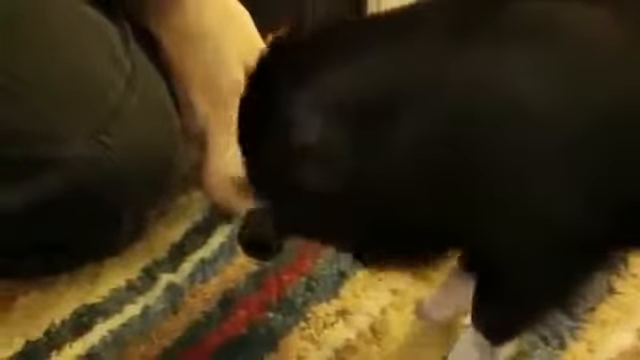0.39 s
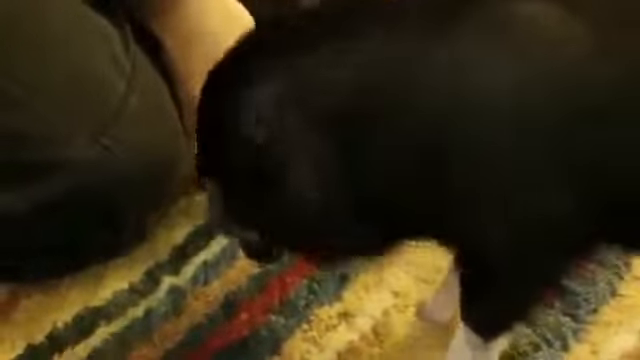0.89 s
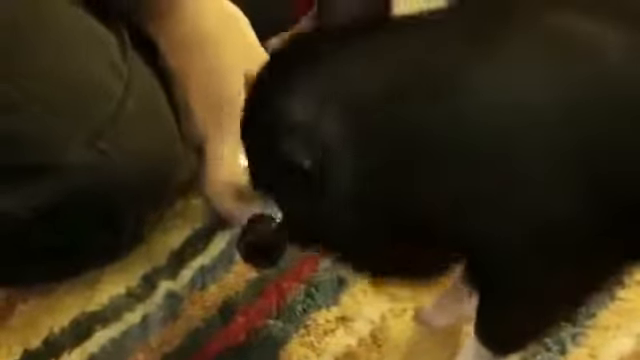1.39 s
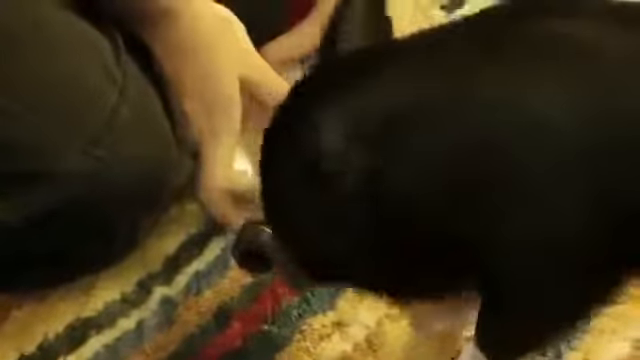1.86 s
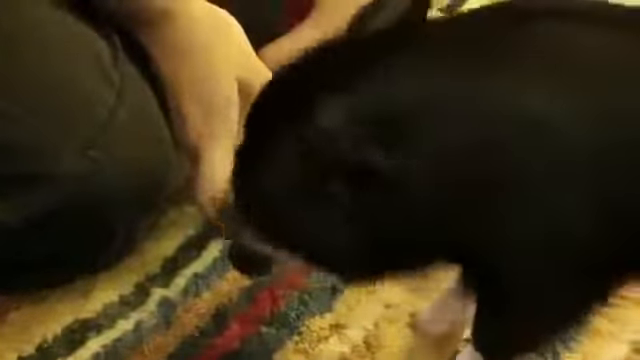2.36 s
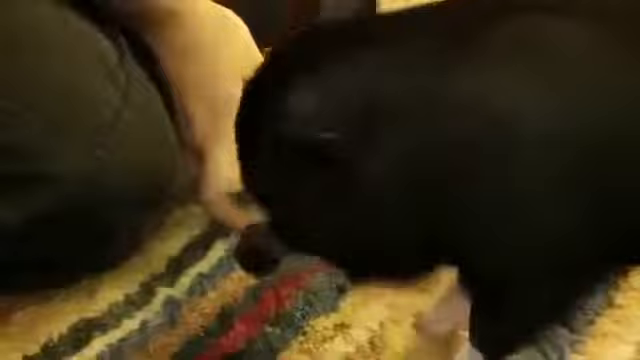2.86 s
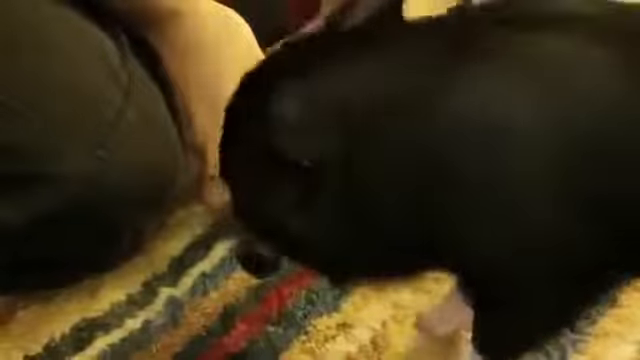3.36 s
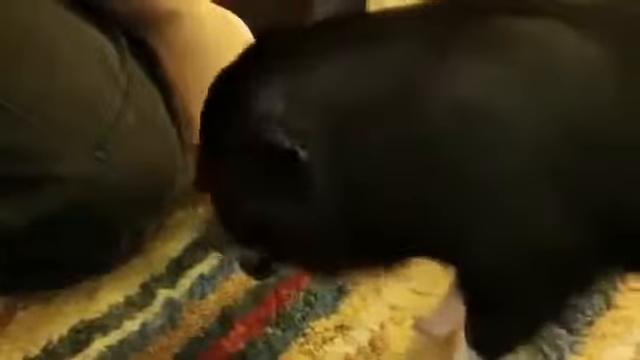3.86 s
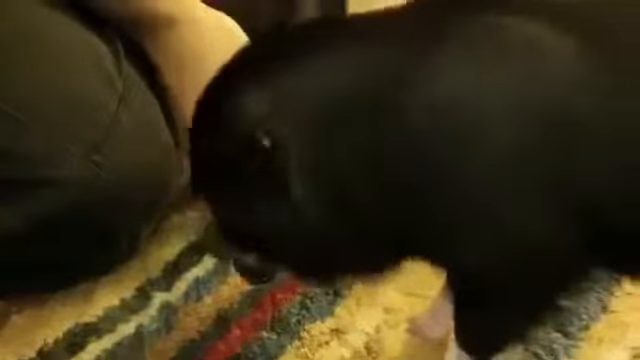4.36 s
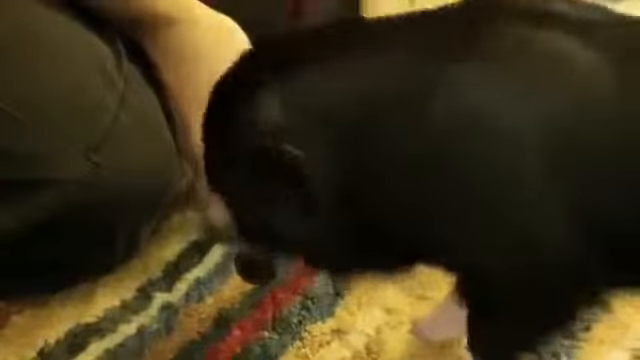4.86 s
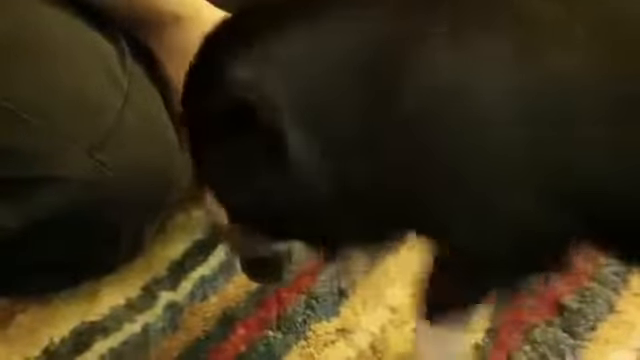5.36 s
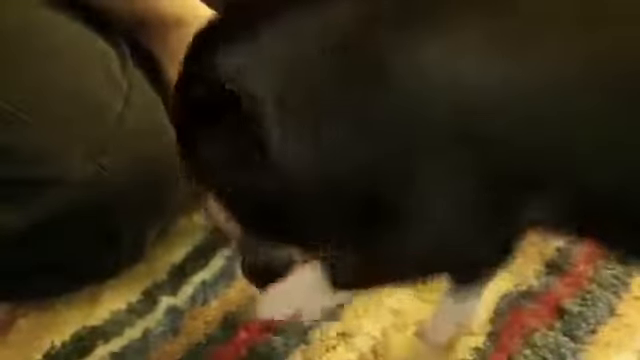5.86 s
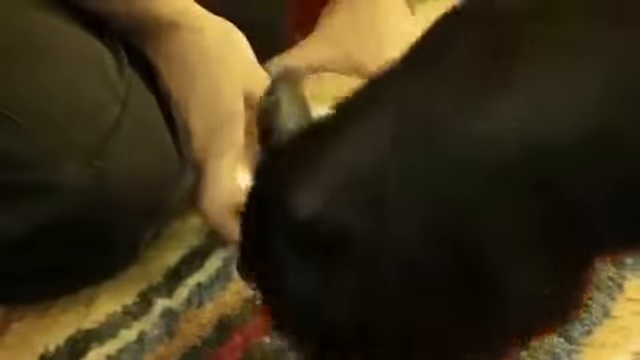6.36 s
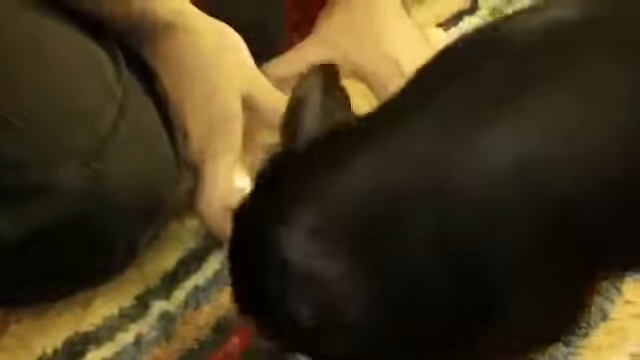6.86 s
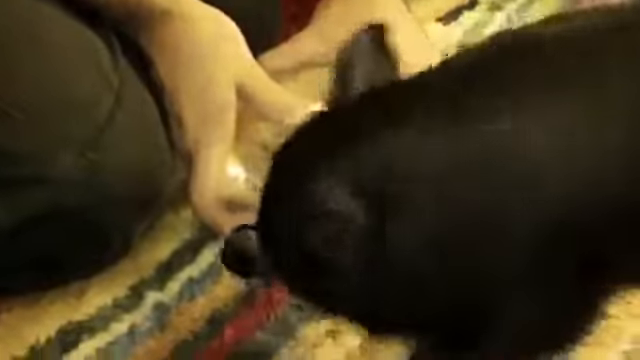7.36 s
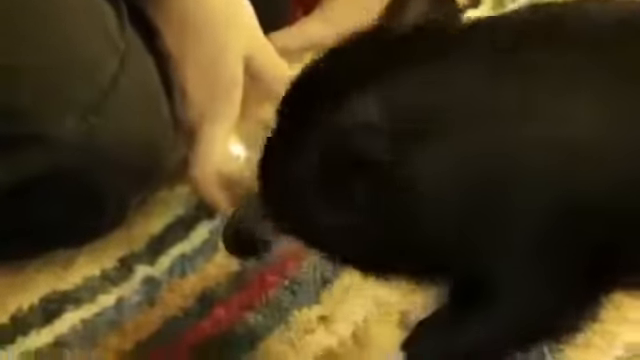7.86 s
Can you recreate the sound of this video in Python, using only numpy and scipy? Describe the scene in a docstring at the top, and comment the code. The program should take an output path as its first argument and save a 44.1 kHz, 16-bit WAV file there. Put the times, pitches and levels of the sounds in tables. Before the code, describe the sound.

A pig chews an empty plastic bottle on a rug, very close to a stereo microphone in a small furnished room. From 0 to 0.8 seconds, loud hollow pops and crunchy crackle come in tight clusters, the hardest near 0.13 and 0.7, with low microphone thuds. From 0.9 to 2 the bites are sparser, with soft deep knocks around 1 second. From 2.2 to 3.3 chewing is busy, rattling with clicks and ticks. A hard pop thuds at 3.4; uneven crunches follow, with strong pops near 4.15 and 4.8. A bright, sharp snap cracks at 5.7, then short crackles run to 6.45. It nearly falls quiet until a lone pop at 7.0, then small clicks return from 7.3 and thicken to the end at about 8.2. Reflections are short and dry, and a faint, wide, low-weighted hush stays throughout.

```python
"""A pig chews and nudges an empty plastic bottle held on a rug, close to two microphones indoors.
The wall buckles in pops, small ticks and dense crackle, bite by bite: short blows ring the bottle's modes.
Low knocks are dying sines; a broad low mode gives the thumps of the overloaded microphone at a few loud pops.
A small furnished room answers with near copies and a noisy tail, over a quiet, wide floor of filtered noise."""
import sys
import numpy as np
from scipy import signal
from scipy.fft import rfft, irfft, next_fast_len
from scipy.io import wavfile

SR = 44100
rng = np.random.default_rng(int(sys.argv[2]) if len(sys.argv) > 2 else 0)


def invert_db(x):
    """Field ratio 10**(x/20) for x, a level in decibels (scalar or array-like)."""
    u = np.asarray(x, float) / 20
    return 10 ** u


def to_wav(s):
    """Save 16-bit WAV."""
    ch = np.atleast_2d(s).T  # columns
    pcm = np.round(np.clip(ch, -1, 1) * 32767)  # PCM
    wavfile.write(sys.argv[1], SR, pcm.astype(np.int16))


N = 362943  # length in samples

# Levels in the tables are relative: trims, the room and the microphones act on them later.
# loudest pops of the wall: start_s, level_db, then against it upper_db, thump_db, skin_db
POPS = [(0.018, -27, -11, -11, -13), (0.094, -9.5, -11, -13, -20.5), (0.115, -15, -12, -6.5, -24),
        (0.117, -5, -21.5, -27, -40), (0.129, -7, -6, -19, -4), (0.136, -5.5, -16.5, -27, -3),
        (0.144, -13.5, -5.5, -18.5, -23), (0.249, -27.5, -9, -20, -20), (0.258, -25, -12, -17, -17),
        (0.269, -27, 1, -27, -12), (0.275, -21, -2, -24, -13), (0.288, -23, -13, -10.5, -18),
        (0.312, -14.5, -3, -16.5, -5), (0.321, -17.5, -1.5, -4.5, -5), (0.329, -20, -9, -22, -13),
        (0.41, -23, -5.5, 1.5, -27), (0.43, -17, -12, -6.5, -7.5), (0.441, -9, -3.5, -18.5, -7.5),
        (0.446, -14, -14.5, -13, -4), (0.452, -17.5, -13, -28, 5), (0.5, -31.5, -13, -21, -3.5),
        (0.53, -26.5, -4, -13, -6.5), (0.561, -15, -3, -18, -3.5), (0.586, -14.5, -19.5, -30, -23),
        (0.61, -24, -14, -4, -13), (0.669, -30, 1, -14.5, -16), (0.682, -18, 3.5, -12.5, -17),
        (0.687, -7, -3.5, -22.5, -8), (0.695, -21.5, -1, -15.5, -1.5), (0.699, -20.5, -11, -16.5, -16),
        (0.725, -7.5, -7.5, -41, -10.5), (0.738, -26, -6, -16, 7), (0.748, -18, -11, -31, -19),
        (0.757, -27.5, -14, -21, -18), (0.846, -25, -17, -16.5, -23), (0.941, -18.5, -9, -9.5, -26),
        (1.011, -19, -14, -8, -29), (1.037, -13, -13.5, -12.5, -16), (1.05, -28, -3, -21, 1),
        (1.174, -30.5, -10, -1.5, -4), (1.197, -27, -24, -6, -10), (1.223, -19, -10, -13, -12),
        (1.242, -19.5, -21, -12, -26), (1.374, -26, -18, -3, -25), (1.392, -21.5, -4.5, -36, -2),
        (1.651, -31, -23, -16, 1), (1.666, -26.5, -5.5, -9, -38), (1.835, -35, -13, -15, -16),
        (1.849, -20.5, -31, -14.5, -26), (1.927, -21.5, -11, -27, -23), (1.957, -25, -25, -14, -26),
        (1.977, -19, -4, -10, -7), (2.086, -18.5, -18, -9.5, -16), (2.196, -28, 5, -11, 3.5),
        (2.202, -23.5, 10.5, -16, 8.5), (2.215, -32.5, 0.5, -17, -3), (2.238, -32, -11, 3.5, -15),
        (2.273, -23.5, -6, -2, -12), (2.296, -24, -7, -18, -9), (2.303, -14, -3.5, -21, -12),
        (2.312, -32.5, -3, -11, -5), (2.326, -23, 0, -24, -1), (2.34, -17, -1.5, -17, -9),
        (2.351, -18.5, -7, -16, -15), (2.399, -11, -27, -23, -8), (2.411, -21, -24, -27.5, 1),
        (2.44, -27, -9, -28, -15), (2.452, -21, -14, -23, 1), (2.483, -11, -15, -14, -20.5),
        (2.508, -12, -14, -30, -22), (2.522, -25, -13, -26, -14), (2.537, -21, -18, -10, -11),
        (2.632, -35, -19, -9, -24), (2.66, -16, -6.5, -36, -8), (2.671, -16.5, -12, -25, -7.5),
        (2.691, -14.5, -2.5, -19, -11.5), (2.706, -23, -1.5, -2, -6), (2.735, -12, -17.5, -9.5, -8),
        (2.743, -22, -0.5, -26, -8.5), (2.767, -26.5, -11, -1, -25), (2.875, -23, -5.5, -0.5, -8),
        (2.885, -15, -7.5, -29, -14), (2.895, -16, -12, -4, -15), (2.914, -24.5, 7, -9, -14),
        (2.931, -13.5, -2.5, -17, -35), (2.945, -20.5, -3, -19, -17), (2.966, -35, 0, -16, -3),
        (3.027, -25.5, -11, -11.5, -14), (3.075, -24.5, -2.5, -7, -10), (3.094, -26.5, 0, -4.5, -5),
        (3.142, -29, -3, -20, 1), (3.174, -26, -16, -23.5, -26), (3.254, -30.5, -1.5, 1.5, -15),
        (3.262, -24, -3, -3.5, -3.5), (3.299, -19.5, -8.5, -6, -12.5), (3.416, -2.5, -10, -12, -8.5),
        (3.428, -35, 6, -11, -18), (3.56, -30, -14, -27, -11), (3.568, -18.5, -13, -17, -4.5),
        (3.579, -23.5, -11, -18, -17), (3.593, -23.5, -11, -16, -11.5), (3.626, -26, -9, -19, -11),
        (3.635, -20.5, -13, -17, -15), (3.65, -26.5, -19, -14, -6.5), (3.807, -20.5, -5.5, -18, -9),
        (3.825, -17.5, -12, -22, -9), (3.847, -12.5, -10.5, -12, -13), (3.857, -16, -8, -17, -27),
        (3.87, -20, -1, -11, -14), (3.955, -21, -6, -12.5, -14), (3.962, -18, -12, -17, -8.5),
        (4.002, -17, -25, -19, -18), (4.063, -30, -19, -14, -18), (4.085, -14.5, -10.5, -12, -4),
        (4.13, -28, -20, -4, 10), (4.14, -24, -9.5, -30, -23), (4.158, -6.5, -12.5, -49, -15),
        (4.19, -20.5, -14, -22, -29), (4.315, -27, 0, -11, 0), (4.325, -12, -5.5, -27.5, -7),
        (4.373, -29, -16, 0, -17), (4.52, -28, -12, -21, 1), (4.537, -26, -28, -2, -8.5),
        (4.583, -29, -17, -6.5, -20), (4.708, -27.5, -5, -18, -9), (4.727, -15, -22, -11.5, -13),
        (4.73, -12.5, -22, -13, -19), (4.744, -26.5, -1.5, -8, -23), (4.778, -8, -9.5, -14, -7.5),
        (4.793, -20, -19, -13.5, -10.5), (4.802, -29, -14, -9, -19), (4.912, -29.5, 6, -3.5, -9),
        (4.918, -14.5, -7, -31, -2.5), (5.016, -31, -10, -1.5, -20), (5.061, -24.5, -13, -11.5, -4.5),
        (5.106, -24.5, -2, -33, 1), (5.129, -24, 2, -28, 1.5), (5.141, -27, -18, -16, -13),
        (5.187, -30.5, -9, -20, -21), (5.205, -28.5, -14, -10, -23), (5.236, -21.5, -12, -15, -11),
        (5.265, -16.5, -14, -34, -19), (5.286, -24, -3, -24, -4), (5.342, -26, -13, -3, -22),
        (5.375, -29.5, -8, -12, -17), (5.396, -18, -13, -15, -5), (5.409, -16.5, -9, -28, -10),
        (5.417, -16, -10, -7, -6), (5.443, -21, -13, -19, -11), (5.484, -24, -2, -13, -15),
        (5.635, -27, -18, -17, -28), (5.716, -5, -6, -16, -5), (5.726, -16, -20.5, -18.5, -19),
        (5.742, -31, -16, -18, -9), (5.858, -21, -29, -17, -16), (5.872, -20, -24, -22, -26),
        (5.9, -25.5, -12, -14, -7.5), (5.978, -30, -15, -25, -20), (6.013, -29.5, -14, -17, -11),
        (6.045, -30.5, -13, -13, -7), (6.073, -12, -18, -17.5, -13.5), (6.08, -16.5, -9.5, -11.5, -19),
        (6.094, -25, -16, -15, -15), (6.213, -20.5, -9, -19, -6.5), (6.225, -22, -6, -5.5, -3.5),
        (6.237, -17, -5, -15.5, -6.5), (6.265, -26, -13, -22, -8), (6.443, -31, 6, -15, 0),
        (7.019, -13, -13.5, -20, -11.5), (7.218, -28.5, -29, -18, -15.5), (7.293, -19, -4, -22, -1.5),
        (7.329, -25.5, -3, -8.5, -25), (7.46, -29.5, -2, -22, -16), (7.508, -29, -22, -7, 2),
        (7.599, -25, -16, -15, -13), (7.614, -19.5, -12, -14, 0.5), (7.635, -25, 1.5, -28, -11),
        (7.69, -29, -7, -18, -12.5), (7.718, -14.5, -9, -27.5, -9.5), (7.721, -19.5, 1.5, -19, -6),
        (7.746, -27, -7, -26, -17), (7.8, -35.5, 1, 6.5, -10), (7.931, -27.5, -10, -12, -22),
        (7.947, -31, 0, -12, -22), (7.982, -30.5, -19, -13, -16), (8.055, -16.5, -21, -16.5, -12),
        (8.065, -16, -13, -26, -13), (8.075, -26.5, -14, -10, -14), (8.104, -21, -26, -8.5, -14.5),
        (8.17, -29, -3, -9, -4), (8.191, -22.5, -12, -22, -16), (8.204, -17, -26, -21, -25.5),
        (8.212, -15, -15.5, -18, -15)]
# creases that break with a sharp treble snap: start_s, level_db
SHARP_SNAPS = [(0.685, -20), (.725, -23), (1.012, -32.5), (1.036, -25), (2.205, -25.5), (3.262, -27),
               (3.417, -20), (4.778, -20), (5.716, -6)]
# bites: start_s, hold_s, crackle_db, then against it skin_db, thump_db
BITES = [(0, 0.003, -19, -13, -7), (0.107, 0.011, -19, -10.5, -15), (0.265, 0.047, -22.5, -11.5, -10),
         (0.405, 0.097, -29, -9, -15), (0.522, 0.13, -33.5, -7.5, -5.5), (0.687, 0.088, -27, -12, -20),
         (0.783, 0.097, -39.5, -5.5, -1), (0.944, 0.013, -38, -7, 4.5), (1.013, 0.027, -29, -10.5, -2.5),
         (1.188, 0.051, -34.5, -10.5, -2.5), (1.366, 0.024, -30.5, -13.5, -9),
         (1.637, 0.018, -40, -5.5, -7), (1.713, 0.0092, -34.5, -11.5, -13),
         (1.839, 0.053, -29, -11.5, -5.5), (1.926, 0.076, -28, -10.5, -10),
         (2.084, 0.015, -34, -10.5, -17.5), (2.192, 0.067, -34.5, -1.5, -2.5),
         (2.292, 0.055, -21, -11.5, -16.5), (2.392, 0.14, -25.5, -10, -8), (2.639, 0.096, -24, -9, -7),
         (2.869, 0.1, -27, -8.5, -13), (3.037, 0.16, -32.5, -9, -5.5), (3.257, 0.083, -33.5, -7.5, -4.5),
         (3.424, 0.074, -34.5, -12, -6), (3.556, 0.012, -31, -21, -27.5), (3.63, 0.018, -31.5, -19, -21),
         (3.82, 0.022, -22.5, -12, -8), (3.972, 0.033, -26, -12, -9), (4.112, 0.044, -19, -9, -12.5),
         (4.33, 0.0097, -35.5, 2, 4.5), (4.362, 0.058, -29.5, -14.5, -13), (4.522, 0.072, -36.5, -12.5, -5),
         (4.663, 0.08, -37, -17, -2.5), (4.784, 0.034, -28, -10, -9.5), (4.904, 0.035, -25, -11, -11),
         (5.052, 0.072, -27.5, -10, -10), (5.179, 0.02, -35, -12.5, -15.5), (5.233, 0.078, -30.5, -9, -6),
         (5.379, 0.044, -24, -11, -19), (5.461, 0.016, -34.5, -8.5, -1.5),
         (5.637, 0.014, -42.5, -34.5, -3.5), (5.729, 0.027, -29, -10.5, -10),
         (5.819, 0.11, -35.5, -14.5, -8), (6.04, 0.026, -26, -10.5, -28), (6.205, 0.04, -31, -8, -11),
         (6.42, 0.041, -34.5, -12.5, -10.5), (7.016, 0.0062, -33.5, -8.5, -6.5),
         (7.186, 0.046, -41, -22, -6), (7.32, 0.028, -35.5, -10.5, -15), (7.471, 0.071, -32.5, -7.5, -4.5),
         (7.586, 0.051, -29.5, -5.5, -3.5), (7.708, 0.011, -22.5, -6.5, -14), (7.799, 0.0072, -39.5, 4, -4),
         (7.926, 0.037, -31, -6.5, -5.5), (7.985, 0.04, -32, -11, -13), (8.039, 0.019, -28.5, -5, -15),
         (8.086, 0.025, -28.5, -10.5, -14), (8.178, 0.052, -27, -13.5, -15.5)]
# deep knocks, perhaps the bottle bumping the floor through the rug;
# the pitch depends on how it is squeezed: start_s, level_db, pitch_hz
KNOCKS = [(0.935, -20.5, 287), (1.012, -17.5, 253), (1.05, -27.5, 302), (1.196, -30.5, 307),
          (1.228, -21.5, 209), (2.206, -16, 219), (2.235, -24.5, 323), (3.261, -26, 283),
          (3.295, -33.5, 278), (3.413, -25, 308), (4.534, -29.5, 281), (4.773, -22.5, 242),
          (6.074, -29, 268), (7.611, -30, 296), (7.942, -29, 239)]
# low thumps that the overloaded microphone adds at a few loud pops: start_s, level_db
OVERLOADS = [(0.132, -21), (0.136, -22), (0.684, -13.5), (3.414, -15)]
# ways the bottle rings, from its body up to the finest treble: pitch_hz, width_hz, level_db
BODY_MODES = [(643.7, 20, -20), (729, 42, -15), (806, 70.6, -4), (820.5, 78, -4.5), (854.3, 24, -16.5)]
UPPER_MODES = [(1052, 79, -1.5), (1131, 57, -4.5), (1212, 91, -1), (1473, 34, -14.5)]
THUMP_MODES = [(75, 110, -7.5), (225, 35, -11.5), (273, 98, 6), (370.5, 74, 2.5), (474, 129, 5),
               (597, 78, -6)]
SKIN_MODES = [(1610, 300, -9), (2080, 318, 2.5), (2450, 240, -2), (2892, 186, -2), (3688, 500, 1.5),
              (4730, 240, -13.5)]
SNAP_MODES = [(4900, 1300, 8.4), (6106, 1370, 14.4), (7540, 1020, 4)]
# the one broad mode of an overload thump: pitch_hz, width_hz, level_db
OVERLOAD_MODE = [(60, 71, 8.5)]
# near surfaces: delay_s, level_db
WALLS = [(.0085, -18.5), (0.0124, -27.5), (.019, -17), (0.027, -43.5)]
# diffuse room tail: frequency_hz, fall_by_60_db_s, level_db
ROOM_TAIL = [(200, 0.29, -10), (1000, .28, -16.5), (3500, 0.17, -6), (4800, 0.1, -9), (6200, 0.08, -11),
             (9000, 0.08, -13)]
# tone of the room noise: frequency_hz, level_db (per Hz)
HUSH_TONE = [(15, -60.5), (25, -1.5), (40, 2), (90, 2.5), (162, -2), (357, -8.5), (3620, -18), (5110, -21),
             (6380, -23), (7900, -25.5), (8500, -37.5), (11700, -47.5), (19800, -120)]
# likeness of the noise on the two sides: frequency_hz, correlation (-1 to 1)
HUSH_LIKENESS = [(60, -0.43), (160, -0.83), (440, -0.72), (1180, -0.38), (3200, -0.43), (8650, -0.74)]
# how far the left microphone leads the right: frequency_hz, lead_radians
LEFT_LEAD = [(80, 0), (150, .75), (260, .75), (600, .3), (2240, .1), (3790, .3), (4570, 1.0), (6120, 1.4),
             (8790, 2.5)]
# microphone colour: frequency_hz, gain_db
MIC_COLOUR = [(20, -15.5), (150, -6), (300, 2), (7000, 0.5), (8500, 0), (10000, -14.5), (13000, -43)]
# band limit after the clipping: frequency_hz, gain_db
BAND_LIMIT = [(9000, -0.5), (10500, -8.5), (12500, -52.5), (20000, -90)]

CLOSE_DB_PER_S, OPEN_DB_PER_S = 698.5, 257  # crackle swells as the jaw closes, dies as it opens
LINGER_DB, SETTLE_DB_PER_S = -8, 89.5  # a faint creak lingers while the wall settles
TICKS_OVER_DB = -5.5  # ticks against the crackle of their bite
SNAP_UNDER_SKIN_DB = 24  # how little treble an ordinary pop has
VOLLEY_S, VOLLEY_FADE_DB = 0.003, 8  # the skin's slips spread over this time, later ones weaker
KNOCK_T60_S, KNOCK_RISE_S = 0.035, 0.0024
HUSH_DB = -48.5  # room noise shared by both sides, ahead of the microphone colour


def unit(x):
    """Scale to rms 1."""
    return x / np.sqrt(np.mean(x ** 2) + 1e-20)


def along(points, hz):
    """Read a curve of (Hz, value) points on a log frequency axis."""
    f, v = np.transpose(points)
    return np.interp(np.log(hz + 1), np.log(f + 1), v)


def filtered(x, response):
    """Multiply the spectrum of x by a response of frequency."""
    m = next_fast_len(N + SR // 2)
    return irfft(rfft(x, m) * response(np.fft.rfftfreq(m, 1 / SR)), m)[..., :N]


def ring(modes, s, db, scatter_db, smear_s, drift_db=0, bend=0):
    """Blows at times s ring every mode afresh, each a little late as the crease travels.

    Modes wax and wane by drift_db and slide in pitch by the share bend as the bottle changes shape."""
    strength = rng.standard_normal((len(s), len(modes)))
    late = rng.random((len(s), len(modes)))
    knots = rng.standard_normal((len(modes), 300))
    out, sample = np.zeros(N), np.arange(N)
    slide = np.interp(sample, np.linspace(0, N, 160), rng.standard_normal(160))
    clock = sample + bend * np.cumsum(slide - slide.mean())  # the bottle's own time runs fast or slow
    for k, (hz, width_hz, mode_db) in enumerate(modes):
        at = np.interp((s + smear_s * late[:, k]) * SR, sample, clock)
        at = np.clip(np.round(at).astype(int), 0, N - 1)
        drift = drift_db * np.interp(s, np.linspace(0, N / SR, knots.shape[1]), knots[k])
        blow_db = db + mode_db + drift + scatter_db * strength[:, k]
        blows = np.bincount(at, invert_db(blow_db), N)
        pole = np.exp((2j * hz - width_hz) * np.pi / SR)  # a dying sine
        rise = np.exp(-hz / 0.5 / SR)  # the blow builds up within a cycle
        out += signal.lfilter([0, pole * (1 - rise)], np.poly([pole, pole * rise]), blows).imag
    return np.interp(clock, sample, out)


def pops(count=4):
    """Each buckle strikes all mode families in its own balance; the skin lets go in a few slips."""
    s, db, upper, thump, skin = np.transpose(POPS)
    # the small trims share the peak among a family's modes
    body = ring(BODY_MODES, s, db - 0.5, 2.4, smear_s=0.00031, bend=0.03)
    body += ring(UPPER_MODES, s, db + upper + 0.086, 2.4, smear_s=0.00049, bend=0.03)
    low = ring(THUMP_MODES, s, db + thump - 0.1, 0.93, smear_s=0.0021, bend=0.04)

    late = rng.random((len(s), count)) * (np.arange(count) > 0)  # the first slip is on time
    slip_s = (s[:, None] + VOLLEY_S * late).ravel()
    slip_db = ((db + skin)[:, None] - VOLLEY_FADE_DB * late).ravel()
    bright = ring(SKIN_MODES, slip_s, slip_db - 6.0, 2.64, smear_s=0.0007, bend=0.063)
    bright += ring(SNAP_MODES, slip_s, slip_db - SNAP_UNDER_SKIN_DB, 3.7, smear_s=0.0029)
    sharp = ring(SNAP_MODES, *np.transpose(SHARP_SNAPS), 0.43, smear_s=0.00073)
    return body + bright + sharp + low


def pressure(t):
    """Bite pressure as body, skin and thump levels (dB): swell, hold, release; the strongest bite wins."""
    start, hold, db, skin, thump = np.transpose(BITES)[..., None]
    before = np.maximum(start - t, 0)
    after = np.maximum(t - start - hold, 0)
    release = np.minimum(OPEN_DB_PER_S * after, SETTLE_DB_PER_S * after - LINGER_DB)
    shape = db - CLOSE_DB_PER_S * before - release
    return [(shape + share).max(axis=0) for share in (0, skin, thump)]


def crackle(count=8000):
    """A dense crunch of small slips of unequal size; bite pressure sets its level."""
    t = np.arange(0, N + 64, 64) / SR
    body_db, skin_db, thump_db = pressure(t)
    s, luck = rng.random((count, 2)).T
    size_db = np.minimum(-4 * np.log(1 - luck), 13)  # exponential in dB: a few stand out

    def level(db):
        return invert_db(np.interp(np.arange(N) / SR, t, db))

    out = np.zeros(N)
    for modes, db, trim_db in ((BODY_MODES, body_db, -6), (UPPER_MODES, body_db, -11),
                               (THUMP_MODES, thump_db, -5), (SKIN_MODES, skin_db, -3)):
        slips = ring(modes, s * N / SR, size_db, 0.43, smear_s=0.0015, drift_db=4.0, bend=0.045)
        out += level(db + trim_db) * unit(slips)
    # the treble is finer and more even
    fizz = ring(SNAP_MODES, rng.random(3 * count) * N / SR, 0, 2.2, smear_s=0.0032, drift_db=4.5)
    return out + level(skin_db - 12) * unit(fizz)


def ticks(count=400):
    """Small pops at uneven moments follow bite pressure, each with its own size and balance."""
    s = (np.arange(count) + rng.random(count)) * N / SR / count
    size_db = TICKS_OVER_DB + 2.5 * rng.standard_normal(count)
    body_db, skin_db, thump_db = np.array(pressure(s)) + size_db
    families = ((BODY_MODES, body_db, -0.5), (UPPER_MODES, body_db, -7),
                (THUMP_MODES, thump_db, -2.5), (SKIN_MODES, skin_db, -4))
    balance = 1.7 * rng.standard_normal((count, len(families)))
    out = np.zeros(N)
    for k, (modes, db, trim_db) in enumerate(families):
        out += ring(modes, s, db + trim_db + balance[:, k], 1.4, smear_s=0.002038, bend=0.057)
    return out


def knocks():
    """Each knock rings one low mode only, a sine that rises quickly and dies away."""
    s, db, hz = np.transpose(KNOCKS)[..., None]
    t = np.arange(SR // 8) / SR
    fall = invert_db(db + 7 - 60 * t / KNOCK_T60_S)
    rings = fall * (1 - np.exp(-t / KNOCK_RISE_S)) * np.sin(2 * np.pi * hz * t)
    at = np.round(s * SR).astype(int) + np.arange(len(t))
    return np.bincount(at.ravel(), rings.ravel(), N + SR)[:N]


def overload_thumps():
    """Low thumps that the overloaded microphone adds at a few loud pops, each one broad dying mode."""
    return ring(OVERLOAD_MODE, *np.transpose(OVERLOADS), 0, smear_s=0)


def room(x):
    """Near surfaces return dull copies; a diffuse tail differs in each ear and changes as the bottle moves."""
    copies = sum(invert_db(wall_db) * np.pad(x, (round(s * SR), 0))[:N] for s, wall_db in WALLS)
    early = x + filtered(copies, lambda hz: 1 / (1 + 1j * hz / 2500))

    room_hz, t60, db = np.transpose(ROOM_TAIL)
    t60_points, db_points = np.column_stack([room_hz, t60]), np.column_stack([room_hz, db])
    wet, step = np.zeros((2, N + SR)), SR // 4
    for a in range(0, N, step):  # a fresh tail for each quarter second
        hz, t, z = signal.stft(rng.standard_normal((2, SR // 3)), SR, nperseg=256)
        fall = invert_db(-60 * t / along(t60_points, hz)[:, None])
        tail = signal.istft(z * fall, SR, nperseg=256)[1]
        part = signal.fftconvolve(x[None, a:a + step], tail / np.linalg.norm(tail[0]), axes=1)
        wet[:, a + 300:a + 300 + part.shape[1]] += part  # the tail starts 300 samples late
    return early, filtered(wet[:, :N], lambda hz: invert_db(along(db_points, hz)))


def hush():
    """Steady room noise, stronger in the difference of the two sides than in their sum."""
    def tone(hz):
        return invert_db(along(HUSH_TONE, hz))

    def side_share(hz):  # how much difference gives the wanted likeness
        return np.tan(np.arccos(np.clip(along(HUSH_LIKENESS, hz), -0.99, 0.99)) / 2)

    noise = rng.standard_normal((2, N))
    mid = filtered(noise[0], tone)
    side = filtered(noise[1], lambda hz: tone(hz) * side_share(hz))
    return invert_db(HUSH_DB) / np.std(mid) * np.array([mid + side, mid - side])


def scene():
    """The bottle sits to the right; the two microphones hear it with a phase offset."""
    early, wet = room(pops() + crackle() + ticks() + knocks() + overload_thumps())
    direct = filtered(early, lambda hz: np.exp(0.5j * np.outer([1, -1], along(LEFT_LEAD, hz))))
    return invert_db([[-1.8], [1.6]]) * (direct + wet) + hush()  # left and right gain in dB


def band_limit(x):
    """A steep low-pass at the top of the band."""
    return signal.sosfilt(signal.butter(12, 10700, fs=SR, output="sos"), x)


def record(dry):
    """The capsule bends unevenly on the loudest pops, adding a low thud; then colour, soft clip, band limit."""
    bent = dry + 0.14 * dry ** 2
    x = filtered(bent, lambda hz: invert_db(along(MIC_COLOUR, hz)))
    x = x / (1 + np.abs(x / 0.85) ** 6) ** (1 / 6)  # soft clipping towards 0.85
    mix = filtered(x, lambda hz: invert_db(along(BAND_LIMIT, hz)))
    return band_limit(mix)


dry = scene()
out = record(dry)
to_wav(out)
```